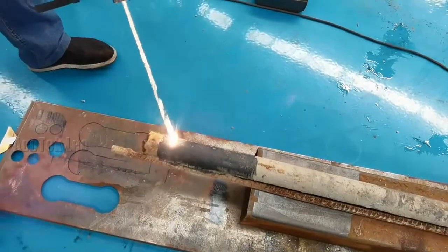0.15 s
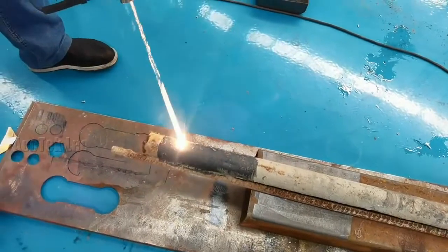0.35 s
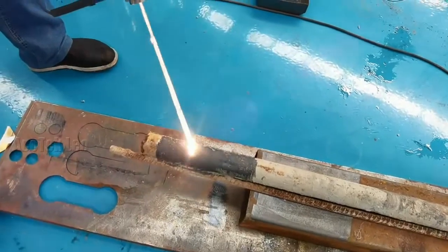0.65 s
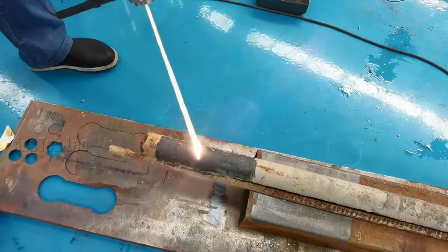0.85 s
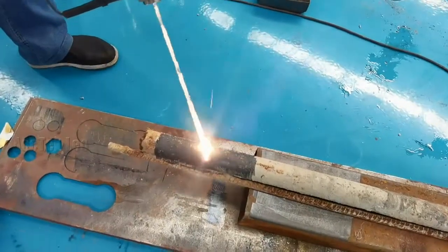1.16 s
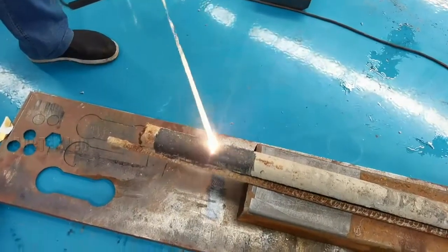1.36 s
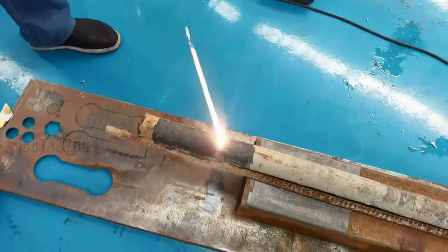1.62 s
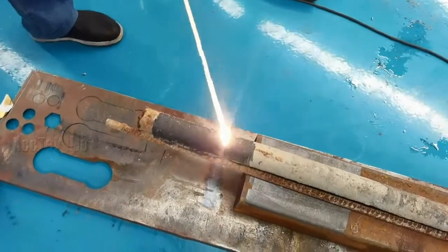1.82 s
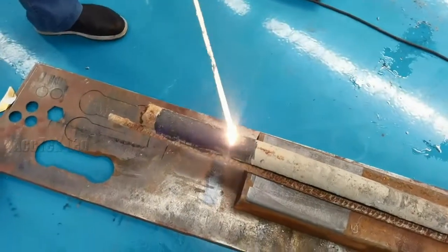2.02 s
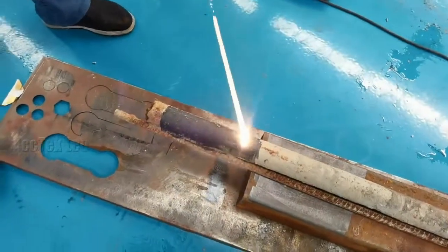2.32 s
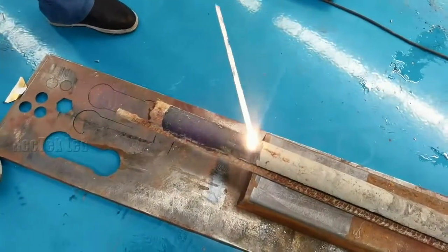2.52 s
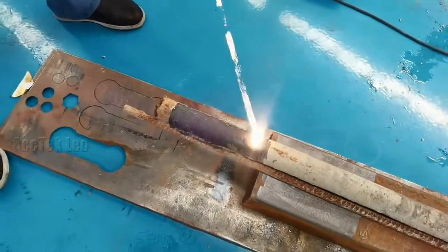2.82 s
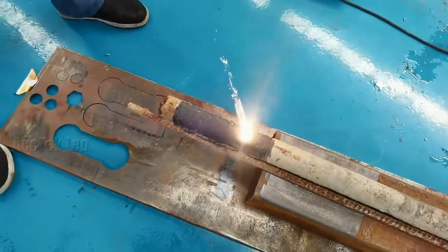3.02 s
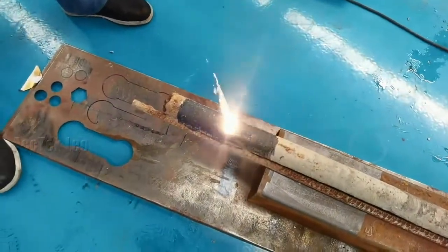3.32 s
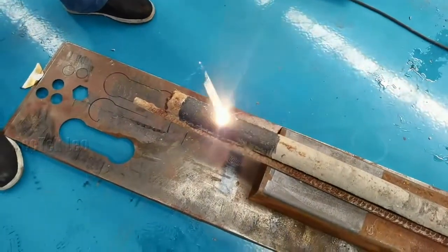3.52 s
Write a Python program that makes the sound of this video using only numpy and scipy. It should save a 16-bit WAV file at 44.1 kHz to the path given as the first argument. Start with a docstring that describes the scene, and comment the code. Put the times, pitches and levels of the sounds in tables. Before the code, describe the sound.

Continuous harsh electric-sounding sizzle from a laser beam on rusty metal, fluttering rapidly and growing slightly stronger; tiny metallic ticks, faint fan and hum underneath, then low wind rumble on the microphone after two seconds, in a live hall.

```python
"""A bright, buzzing sizzle: a hand-held cleaning laser burns rust off a steel part in a workshop.
The spot sweeps to and fro 130 times a second; every pass sets off a ping and a swarm of random pops.
The sizzle follows the rust under the beam; now and then a flake snaps off with a ping of its own.
Behind it, shaped noise makes the fan and sine tones the scanner's hum and whine.
The low mids swell, and later a draught rumbles on the microphone."""
import sys
import numpy as np
from scipy import signal
from scipy.fft import rfft, irfft, next_fast_len
from scipy.io import wavfile
from scipy.ndimage import uniform_filter1d, map_coordinates

SR = 44100
rng = np.random.default_rng(int(sys.argv[2]) if len(sys.argv) > 2 else 0)


def log_audio(samples):
    """Write samples as a 16-bit WAV file to the path given in sys.argv[1]."""
    # one column per channel
    frames = np.atleast_2d(samples).T
    # limit to full scale, then quantise
    limited = np.clip(frames, -1, 1)
    pcm = np.round(limited * 32767).astype(np.int16)
    wavfile.write(sys.argv[1], SR, pcm)


N = 161847
SWEEP_HZ = 129.8  # one sweep = out and back = two passes
TOP_HZ = 15850  # band limit


def amp(db):
    """Decibels to gain."""
    return 10 ** (np.asarray(db) / 20)


def unit(x):
    """Scale to rms 1."""
    return x / np.sqrt(np.mean(x ** 2) + 1e-20)


def along(points, hz, axis=1):
    """One column of a table read on a log frequency axis."""
    table = np.asarray(points)
    return np.interp(np.log(hz + 1), np.log(table[:, 0] + 1), table[:, axis])


def curve(rows):
    """(time [s], value) rows as one value per sample."""
    return np.interp(np.arange(N) / SR, *np.transpose(rows))


def wobble(rate_hz):
    """A smooth random curve with rate_hz knots a second."""
    knots = rng.standard_normal(int(N * rate_hz / SR) + 4)
    return map_coordinates(knots, [np.arange(N) * rate_hz / SR])


def filtered(x, response):
    """x times a complex response of frequency."""
    m = 2 * next_fast_len(N // 2 + SR // 4)
    hz = np.fft.rfftfreq(m, 1 / SR)
    return irfft(rfft(x, m) * response(hz), m)[..., :N]


def causal(db):
    """The minimum-phase response with this gain, by folding the cepstrum."""
    cepstrum = irfft(np.log(amp(db)))
    half = len(cepstrum) // 2
    cepstrum[1:half] *= 2
    cepstrum[half + 1:] = 0
    return np.exp(rfft(cepstrum))


def below(hz, edge_hz, order):
    """Gain of a smooth low-pass."""
    return 1 / (1 + (hz / edge_hz) ** order)


# beam's bite into the rust: (time [s], level [dB])
RUST_BITE = [(0.0, -6), (0.12, -6.5), (0.16, -3), (0.32, -4.5), (0.36, -3), (0.44, -5), (0.48, -0.3),
             (0.56, -9), (0.6, -3.5), (0.89, -4), (0.97, 0), (1.01, -3.5), (1.13, -0.6), (1.21, -4),
             (1.25, -2), (1.49, -0.5), (1.61, -0.4), (1.73, 0), (1.77, -2), (1.84, -3), (1.9, -0.5),
             (1.98, -2), (2.06, 0.1), (2.18, -1.5), (2.3, 0.5), (2.34, -3.5), (2.5, -0.5), (2.54, 0.5),
             (2.58, -1.7), (2.74, 1.5), (2.86, -0.5), (2.9, 1.5), (2.98, 0.7), (3.15, 3), (3.19, -2.5),
             (3.31, 1.5), (3.67, 1)]
# lead of the left microphone: (time [s], lead [ms])
LEFT_LEAD = [(0, 0.06), (.15, 0.05), (.4, 0.0073), (.72, 0.011), (1.1, -0.0064), (1.6, -0.027),
             (2.1, -0.048), (2.75, -0.079), (3.1, -0.05), (3.4, -0.033), (3.67, -0.017)]
# phase of left port against right: (frequency [Hz], phase [rad])
PORT_PHASE = [(500, -2.2), (1200, 2), (2000, 1), (3300, 1.12), (4000, 1.46), (4600, 3.5), (6000, 4),
              (7400, 5), (8900, 7.5), (10000, 4), (11500, 8.5)]
SIZZLE_DB = -18.5


def sizzle():
    """The burning spot reaches two microphones with a drifting delay and a port phase between them."""
    burning = amp(SIZZLE_DB + curve(RUST_BITE)) * ablation()
    source = shifting(burning + flakes())
    half_lead = curve(LEFT_LEAD) / 1000 * SR / 2  # samples
    pair = np.array([map_coordinates(source, [np.arange(N) + side * half_lead], order=5)
                     for side in (1, -1)])
    direct = filtered(pair, lambda hz: np.exp(.5j * np.outer([1, -1], along(PORT_PHASE, hz))))
    return microphones(workshop(direct, source))


# smoother fizz in the sizzle: (frequency [Hz], power share [0-1])
FIZZ_SHARE = [(1000, 0.54), (3000, 0.67), (5500, 0.29), (8400, 0.08), (11000, 0.5), (14000, 0)]
PASS_DB, LOPSIDED_DB = 4.3, 1.7  # swing per pass; out against back
RIPPLE_DB = 1.2  # faster ripple, four times per sweep
PASS_SKEW_RAD, RIPPLE_SKEW_RAD = 1, 3.6
PASS_SPREAD_DB, FLUTTER_DB = 1.65, 1.0
CRACKLE_SPREAD_DB, FIZZ_SPREAD_DB = 3.5, -1.0
FIZZ_SWING = .8  # share of the sweep's swing in dB
PATCH_DB, PATCH_DRIFT_DB = 2, .5  # quick flicker, slow drift of colour
PING_DB = -14


def ablation():
    """A spiky crackle and a smoother fizz, both swelling twice per sweep, with a ping on every pass."""
    angle = 2 * np.pi * SWEEP_HZ * np.arange(N) / SR
    swing_db = PASS_DB * np.cos(2 * angle)
    swing_db += LOPSIDED_DB * (np.cos(angle + PASS_SKEW_RAD) + np.sin(3 * angle))
    swing_db -= RIPPLE_DB * np.cos(4 * angle + RIPPLE_SKEW_RAD)
    uneven_db = PASS_SPREAD_DB * wobble(2 * SWEEP_HZ) + FLUTTER_DB * wobble(40)
    crackle = unit(swarm(CRACKLE_SPREAD_DB) * amp(swing_db + uneven_db))
    fizz = unit(swarm(FIZZ_SPREAD_DB) * amp(FIZZ_SWING * swing_db))
    both = filtered(crackle, lambda hz: np.sqrt(1 - along(FIZZ_SHARE, hz)))
    both += filtered(fizz, lambda hz: np.sqrt(along(FIZZ_SHARE, hz)))
    flickering = patchy(both, PATCH_DB, size=9)
    return patchy(flickering, PATCH_DRIFT_DB, size=45) + amp(PING_DB) * pings()


POPS_PER_S = 13000
MEMORY = 0.51  # carry-over from one sweep to the next
REPEAT_SHARE, REPEAT_HZ = 0.93, 3500  # power share of the repeating pops, mostly below this pitch


def swarm(spread_db):
    """Tiny pops of unequal size; each sweep crosses nearly the same rust, so the pattern partly repeats."""
    def pops():
        """Random-sign impulses at random moments."""
        struck = rng.random(N) < POPS_PER_S / SR
        sign = np.sign(rng.standard_normal(N))
        size_db = spread_db * np.clip(rng.standard_normal(N), -3, 2.8)
        return unit(struck * sign * amp(size_db))
    period = round(SR / SWEEP_HZ)
    sweeps = np.pad(pops(), (0, -N % period)).reshape(-1, period)
    repeating = unit(signal.lfilter([1], [1, -MEMORY], sweeps, axis=0).ravel()[:N])
    share = lambda hz: REPEAT_SHARE * below(hz, REPEAT_HZ, order=2)
    fresh = filtered(pops(), lambda hz: np.sqrt(1 - share(hz)))
    return filtered(repeating, lambda hz: np.sqrt(share(hz))) + fresh


def patchy(x, depth_db, size):
    """x with random patches of gain, some hundred hertz wide and size frames long."""
    z = signal.stft(x, nperseg=512)[2]
    field = rng.standard_normal(z.shape)
    for _ in range(2):
        field = uniform_filter1d(field, size=5, axis=0)
        field = uniform_filter1d(field, size=size, axis=1)
    gain = unit(amp(depth_db * unit(field)))
    return signal.istft(z * gain, nperseg=512)[1][:N]


PING_S = .0016


def ping(t, hz):
    """A short, softly rounded burst of one pitch, starting at t = 0."""
    envelope = np.sin(np.pi * np.clip(t / PING_S, 0, 1)) ** 2
    return envelope * np.sin(2 * np.pi * hz * t)


# main ring, gliding as the spot moves along the steel: (time [s], frequency [Hz])
RING_GLIDE = [(0, 5760), (.13, 6100), (.2, 7340), (.27, 7400), (.5, 7240), (.62, 7300), (.9, 7890),
              (1.15, 8390), (1.82, 8140), (2.1, 8520), (2.7, 8590), (3.3, 8230), (3.67, 8040)]
PING_SPREAD_DB, PING_LOPSIDED_DB = 5, 3.5  # spread of size; out against back
PING_SCATTER, PING_JITTER_S = .035, 0.0002496  # relative spread of pitch; spread of timing


def pings():
    """Every pass of the spot gives one ping near the main ring, each of its own size."""
    passes = 2 * SWEEP_HZ * np.arange(N) / SR + .5
    index = passes.astype(int)
    draws = np.clip(rng.standard_normal((index[-1] + 1, 3)), -2, 2)
    size, pitch, delay = draws[index].T
    t = (passes % 1 - .5) / (2 * SWEEP_HZ) + PING_S / 2 - PING_JITTER_S * delay
    db = PING_SPREAD_DB * size + PING_LOPSIDED_DB * (-1.) ** index
    return unit(amp(db) * ping(t, curve(RING_GLIDE) * (1 + PING_SCATTER * pitch)))


# flakes snapping off, before room and microphones: (time [s], level [dB])
FLAKE_SNAPS = [(0.4843, -16), (0.866, -18), (0.9654, -12), (1.1837, -17), (1.2704, -19), (1.3273, -20),
               (1.6591, -18), (1.6963, -29), (1.8226, -9), (2.75, -14), (2.8035, -8), (2.8614, -14),
               (3.3807, -9.5), (3.6622, -27)]


def flakes():
    """Each flake leaves with one ping at the pitch of the main ring."""
    t = np.arange(N) / SR
    ring_hz = lambda s: np.interp(s, *np.transpose(RING_GLIDE))
    return sum(amp(db) * ping(t - s, ring_hz(s)) for s, db in FLAKE_SNAPS)


# mids within the sizzle: (time [s], level [dB])
MIDS_LEVEL = [(0, 3.5), (.16, 1.5), (1.13, -2.7), (1.45, -3.5), (1.5, -1.6), (1.94, -2), (2.5, 3),
              (2.82, 0.5), (3.2, 2.5), (3.67, -1.5)]
# hiss near 6 kHz: (time [s], level [dB])
UPPER_MIDS_LEVEL = [(0, 0), (.5, -1.5), (1.3, -1), (1.9, -0.5), (2.06, 4), (2.25, -1.5), (2.7, -2.5),
                    (3, -2.5), (3.25, 1), (3.67, 1)]
# top treble: (time [s], level [dB])
TOP_TREBLE_LEVEL = [(0, 4), (.2, 1.5), (.5, 2.5), (.95, -1.5), (1.25, -1.7), (2.1, -1.5), (2.6, 6.5),
                    (3.05, 0), (3.67, -3.5)]
# hollow gliding above the main ring: (time [s], frequency [Hz])
HOLLOW_GLIDE = [(0, 9140), (.5, 9300), (.75, 10050), (1.1, 10840), (1.9, 11000), (2.3, 11500),
                (2.85, 11550), (3.3, 11100), (3.67, 10700)]
# passing lower rings: (peak time [s], half length [s], frequency [Hz], half width [Hz], level [dB])
PASSING_RINGS = [(1.79, 0.11, 2480, 190, 7.5), (3.33, 0.17, 3350, 100, 1.5), (3.1, 0.068, 2260, 320, 2.5)]
MIDS_HZ, TOP_TREBLE_HZ, AIR_HZ = 3930, 8250, 10100  # band edges
UPPER_MIDS_HZ, UPPER_MIDS_WIDTH_HZ = 5800, 580  # centre, half width
RING_DB, RING_WIDTH_HZ, RING_REST_HZ = 5, 1830, 8526  # height, half width, usual place
HOLLOW_DB, HOLLOW_WIDTH_HZ = -7.5, 430


def shifting(source):
    """As the beam travels, ring and hollow glide, lower rings come and go, mids and treble rise and fall."""
    hz, t, z = signal.stft(source, SR, nperseg=256)
    hz = hz[:, None]
    at = lambda rows: np.interp(t, *np.transpose(rows))
    bell = lambda x, centre, width: np.exp(-.5 * ((x - centre) / width) ** 2)
    # moved ring minus resting ring: the resting one is already in the microphone colour
    ring = RING_DB * (bell(hz, at(RING_GLIDE), RING_WIDTH_HZ) - bell(hz, RING_REST_HZ, RING_WIDTH_HZ))
    lower = sum(db * bell(t, s, length) * bell(hz, centre, width)
                for s, length, centre, width, db in PASSING_RINGS)
    hollow = HOLLOW_DB * bell(hz, at(HOLLOW_GLIDE), HOLLOW_WIDTH_HZ)
    mids = at(MIDS_LEVEL) * below(hz, MIDS_HZ, order=30)
    upper_mids = at(UPPER_MIDS_LEVEL) * bell(hz, UPPER_MIDS_HZ, UPPER_MIDS_WIDTH_HZ)
    treble_band = below(hz, AIR_HZ, order=30) - below(hz, TOP_TREBLE_HZ, order=30)
    treble = at(TOP_TREBLE_LEVEL) * treble_band
    gain = amp(ring + lower + hollow + mids + upper_mids + treble)
    return signal.istft(z * gain, nperseg=256)[1][:N]


# reverberation time: (frequency [Hz], T60 [s])
ROOM_T60 = [(200, 2), (2000, 1.05), (8000, 1.15), (15000, 1.27)]
# reverberation against direct sound: (frequency [Hz], level [dB])
ROOM_LEVEL = [(500, -9.5), (1500, -2.5), (3000, -4), (6000, -3.5), (8400, -4), (11000, -4.5), (14000, 6)]
EARLY_DB, EARLY_T60_S = -13, .06


def workshop(direct, source):
    """Early echoes off steel and floor, then the hall's tail: decaying noise convolved with the source."""
    hz, t, z = signal.stft(rng.standard_normal((2, SR // 2)), SR, nperseg=256)
    decay = amp(-60 * t / along(ROOM_T60, hz)[:, None])
    tail = signal.istft(z * decay, SR, nperseg=256)[1]
    early_decay = amp(-60 * np.arange(tail.shape[1]) / SR / EARLY_T60_S)
    early = rng.standard_normal(tail.shape) * early_decay

    def answer(impulse):
        """Source through one stereo impulse response."""
        scaled = impulse / np.linalg.norm(impulse[0])
        return signal.fftconvolve(source[None], scaled, axes=1)[:, :N]
    wet = lambda hz: amp(along(ROOM_LEVEL, hz))
    mix = direct + amp(EARLY_DB) * answer(early) + filtered(answer(tail), wet)
    # hold the power of direct plus echoes
    return filtered(mix, lambda hz: 1 / np.sqrt(1 + wet(hz) ** 2 + amp(EARLY_DB) ** 2))


# sizzle colour at the microphones: (frequency [Hz], left level [dB], right level [dB])
MIC_COLOUR = [(500, -29.5, -30), (1280, -26.5, -30.5), (1440, -22, -25), (2300, -21.5, -20.5),
              (2640, -17.5, -18), (2895, -20.5, -21), (3420, -15, -12.5), (3970, -20.5, -20),
              (4050, -13.5, -9.5), (4940, -14, -13), (4920, -15.5, -8), (5180, -13.5, -10.5),
              (5570, -7.5, -4.5), (6200, -8.5, -6), (6900, -5, -5.5), (7640, -6, -6.5), (8280, -3.5, -3.5),
              (8420, 0.5, -7), (8770, -1, -11), (8950, -6, -17.5), (9550, -6, -13), (10080, -14, -15),
              (11030, -15, -15), (11580, -19.5, -25.5), (12200, -25.5, -27), (14200, -23.5, -35),
              (15600, -26, -45)]


def microphones(pair):
    """Minimum-phase colour shared by both sides, ringing near 8 kHz, with more top treble on the left."""
    def colour(hz):
        """Response of both sides, scaled to rms 1."""
        db = np.array([along(MIC_COLOUR, hz, axis=1), along(MIC_COLOUR, hz, axis=2)])
        shared = db.mean(0)
        band = (1 - below(hz, 336, order=4)) * (hz < TOP_HZ)
        gain = causal(shared) * amp(db - shared) * band
        return gain / np.sqrt(np.mean(abs(gain) ** 2))
    return filtered(pair, colour)


# left-right likeness of the low noises: (frequency [Hz], correlation [0-1])
LIKENESS = [(100, .99), (250, 0.95), (600, 0.92), (1500, 0.5)]


def rush(spectrum):
    """Stereo noise of rms 1, nearly mono in the bass: mid and side split by the likeness."""
    turn = lambda hz: np.arccos(np.clip(along(LIKENESS, hz), -1, 1)) / 2
    split = lambda hz: amp(along(spectrum, hz)) * [np.cos(turn(hz)), np.sin(turn(hz))]
    mid, side = filtered(rng.standard_normal((2, N)), split)
    return unit(np.array([mid + side, mid - side]))


# draught on the microphone: (time [s], level [dB])
DRAUGHT_LEVEL = [(0, -71), (2.07, -55.5), (2.12, -45.5), (2.19, -30), (2.3, -28), (2.37, -26.5),
                 (2.43, -32.5), (2.5, -28), (2.55, -33.5), (2.73, -33.5), (2.8, -40), (3.05, -39.5),
                 (3.1, -46.5), (3.2, -41), (3.35, -38.5), (3.67, -38)]
# its colour: (frequency [Hz], relative level [dB per Hz])
DRAUGHT_COLOUR = [(15, -46), (25, -37), (87, 0.5), (102, 1), (135, -2.5), (173, -1), (240, -13.5),
                  (345, -13.5), (502, -15.5), (580, -22), (680, -20.5), (900, -29.5), (1170, -30),
                  (1980, -120)]
BUFFET_DB = 1.2


def draught():
    """Moving air buffets the microphone: low noise with a wavering level."""
    return amp(curve(DRAUGHT_LEVEL) + BUFFET_DB * wobble(20)) * rush(DRAUGHT_COLOUR)


# low-mid swells, the later one as the draught arrives: (time [s], level [dB])
SWELL_LEVEL = [(.8, -66), (.89, -47), (1.02, -54), (1.25, -60), (1.53, -63), (1.7, -83), (2.1, -60),
               (2.14, -53), (2.25, -56), (2.45, -46), (2.7, -60)]
# their colour: (frequency [Hz], relative level [dB per Hz])
SWELL_SPECTRUM = [(120, -4), (220, 8), (330, 1.5), (520, -2), (800, 1), (1100, -44), (2000, -70)]


def swell():
    """Low-mid noise swells softly and briefly."""
    return amp(curve(SWELL_LEVEL)) * rush(SWELL_SPECTRUM)


# fan: (time [s], level [dB])
FAN_CURVE = [(0, -53), (.22, -50), (.32, -48), (.9, -56), (1.15, -45.5), (1.3, -54.5), (1.5, -46),
             (1.7, -52), (2.05, -55.5), (3.67, -54)]
# fan colour: (frequency [Hz], relative level [dB per Hz])
FAN_COLOUR = [(15, -54), (25, -20), (70, -22), (124, -0.5), (157, -8), (204, -3), (286, -19.5),
              (507, -12.5), (556, -16), (844, -33.5), (1000, -16.5), (1300, -21.5), (2200, -120)]
# scanner hum: (multiple of the sweep rate, level [dB])
HUM_TONES = [(1, -56.5), (4, -67.5)]
# scanner whine: (time [s], level [dB])
WHINE_LEVEL = [(0, -68), (2.05, -66), (2.12, -54), (2.22, -62), (2.37, -62), (2.44, -48.5), (2.53, -57),
               (2.72, -51), (2.9, -66), (3.15, -59.5), (3.35, -68), (3.67, -53)]
WHINE_ORDER = 8  # multiple of the sweep rate
HUM_WAVER_DB, HUM_DRIFT_RAD = 3, 1


def machine():
    """The cooling fan as coloured noise; the scanner's hum and whine as wavering sweep harmonics."""
    angle = 2 * np.pi * SWEEP_HZ * np.arange(N) / SR

    def tone(order, db):
        """One harmonic with wavering level and phase."""
        level = amp(db + HUM_WAVER_DB * wobble(23.5))
        return level * np.sqrt(2) * np.sin(order * angle + HUM_DRIFT_RAD * wobble(20))
    hum = sum(tone(order, db) for order, db in HUM_TONES)
    whine = tone(WHINE_ORDER, curve(WHINE_LEVEL))
    fan = amp(curve(FAN_CURVE) + wobble(5.8)) * rush(FAN_COLOUR)
    return fan + hum + whine


def scene():
    """Sizzle, machine, low-mid swells and draught together."""
    return sizzle() + machine() + swell() + draught()


def record(dry):
    """Round off the highest peaks, then cut all above the band limit."""
    held = dry / (1 + np.abs(dry / .85) ** 8) ** (1 / 8)
    return filtered(held, lambda hz: hz < TOP_HZ)


dry = scene()
out = record(dry)
log_audio(out)
```